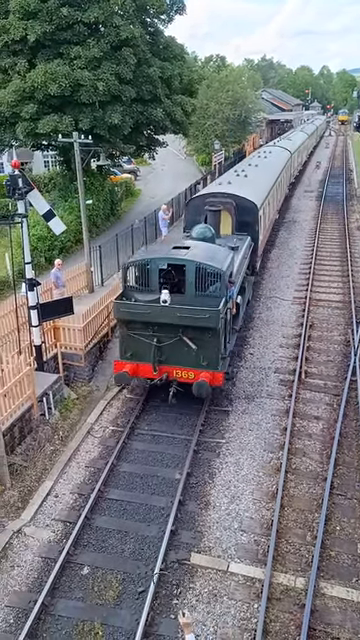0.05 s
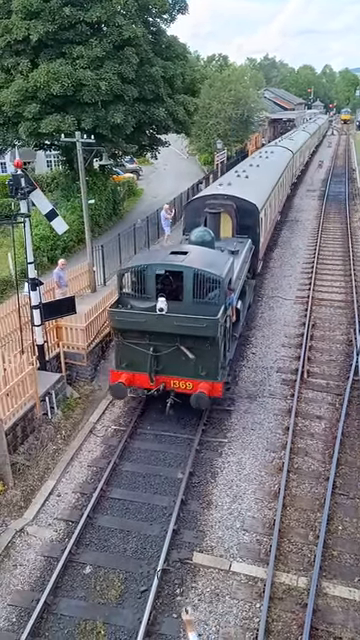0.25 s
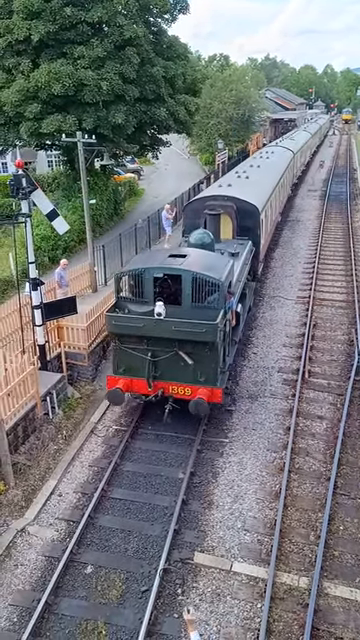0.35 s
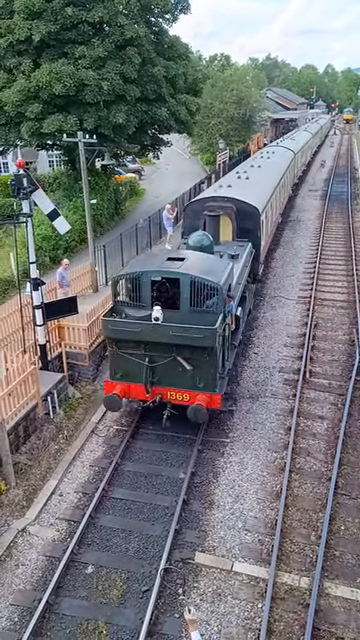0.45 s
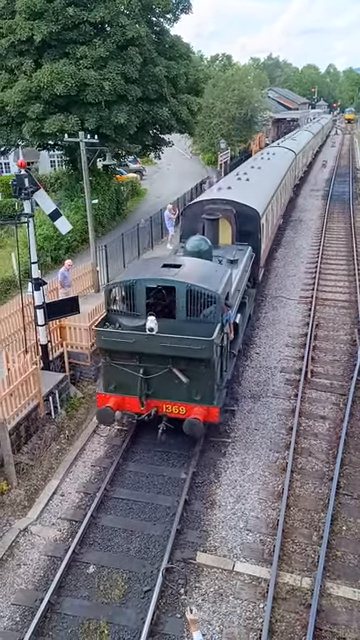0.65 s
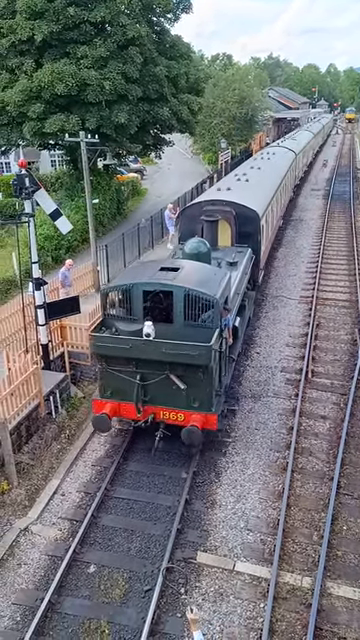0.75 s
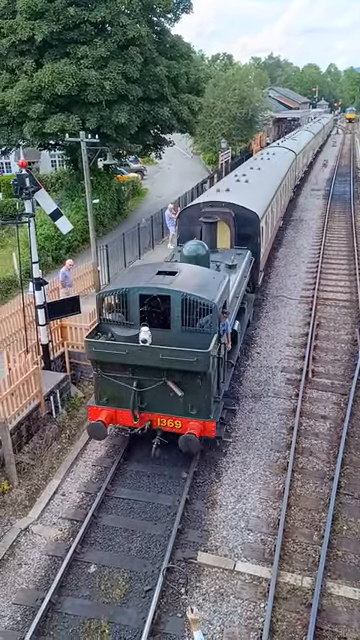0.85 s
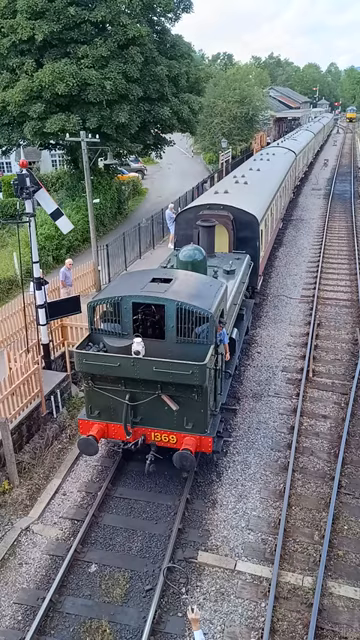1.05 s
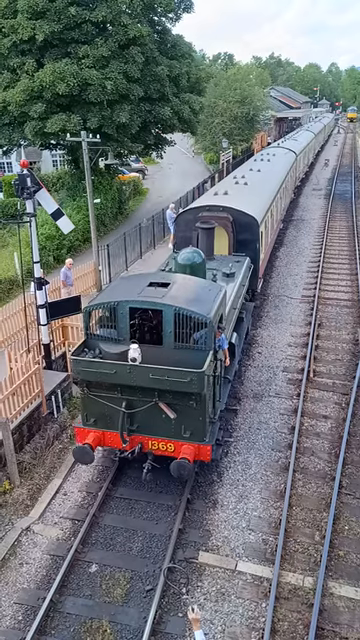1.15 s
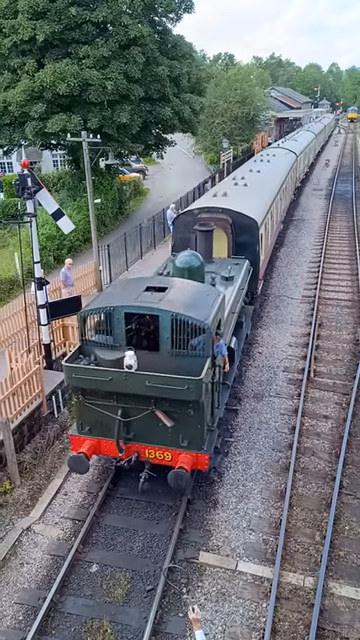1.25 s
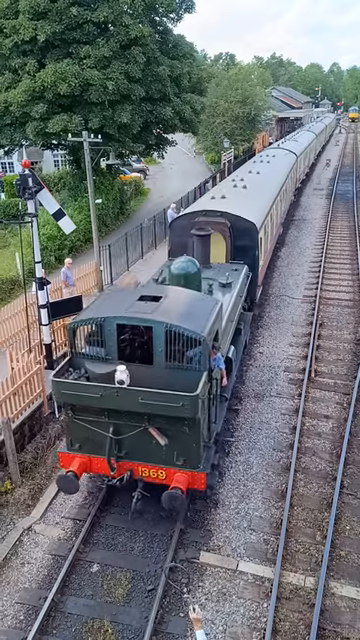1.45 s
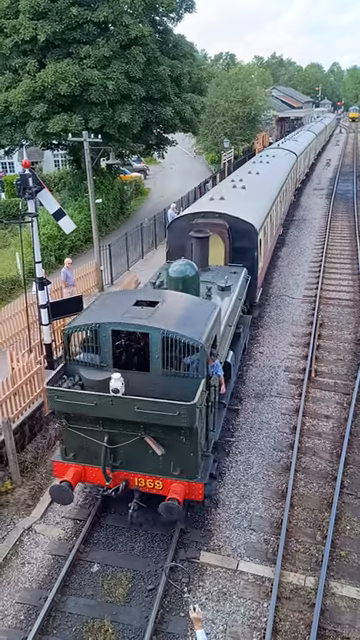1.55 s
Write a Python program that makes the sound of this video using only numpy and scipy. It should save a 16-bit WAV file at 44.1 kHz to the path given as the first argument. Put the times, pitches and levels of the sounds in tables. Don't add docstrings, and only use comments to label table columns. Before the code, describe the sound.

Steam locomotive exhaust chuffs: a puff fades at the start, then strong ones peak near 0.25, 0.6, 0.95, 1.3 and 1.64 seconds, the first roaring loudest. Each begins with a breathy hiss and brief whistle, then a hollow, ringing boom and short outdoor echo. Between them come steam spits, soft thuds, faint wheel squeal and a light rod clink near 1.16, over quiet low rumble.

```python
import sys
import numpy as np
from scipy import signal
from scipy.fft import rfft, irfft, next_fast_len
from scipy.io import wavfile
from scipy.ndimage import uniform_filter1d, map_coordinates

SR = 44100
rng = np.random.default_rng(int(sys.argv[2]) if len(sys.argv) > 2 else 0)


def master(y):
    cut = np.clip(np.atleast_2d(y).T, -1, 1)
    pcm = np.round(cut * 32767)
    wavfile.write(sys.argv[1], SR, pcm.astype(np.int16))


def decibels_to_gain(level_db):
    exponent = np.asarray(level_db, float) / 20
    return 10 ** exponent


N = 70560
T = np.arange(N) / SR
SHARED = np.array([[1], [0]])

# (frequency [Hz], level [dB])
RUMBLE_COLOUR = [(18, -14), (30, 11.5), (309, -3), (392, -9), (523, -6.5), (883, -4.5), (955, -5),
                 (2660, -20.5), (15800, -43)]
# (frequency [Hz], time to fall 60 dB [s])
YARD_ECHO = [(100, 0.38), (1000, 0.33), (5000, 0.48), (11000, 0.079)]
# (time [s], level [dB], pitch [Hz], left over right [dB], dull rush [dB])
THUDS = [
    (0.136, -45.5, 112.1, 31, -26.5),
    (0.474, -42, 150, 2, 3.5),
    (1.198, -47.5, 125.2, 28, -32),
]
# (pitch [Hz], level [dB], time to fall 60 dB [s])
ROD_RING = [(9150, -52, .6), (9235, -53, .6), (2720, -42, .07), (4100, -42, .05), (6300, -50, .06),
            (15100, -61, .1)]
# (start [s], level [dB], pitch [Hz], end [s])
WHEEL_SINGING = [(.01, -81, 4500, .15), (.5, -66, 4500, .79), (.79, -65, 2650, .85), (1.0, -69, 5750, 1.13),
                 (1.01, -68, 6500, 1.09), (1.04, -67, 5000, 1.15), (1.4, -71, 5650, 1.45)]
# (time [s], level [dB], fall [dB per s], brightness [dB per octave])
SPITS = [
    (0.464, -27.5, 482, 4.5),
    (0.863, -34, 315, 9),
    (1.161, -43, 379, 4.8),
    (1.234, -39, 262, 5),
]
# (frequency [Hz], level [dB])
SPIT_COLOUR = [(1200, -85), (1900, 3), (2300, 3.5), (3000, 5), (4300, -1.5), (6000, -5.5), (8000, -16),
               (12200, -22.5), (15800, -35)]
# (loudest time [s], level [dB], rise [dB per s], fall [dB per s])
LEAKS = [
    (0.381, -38, 173, 300),
    (0.528, -46, 142, 189),
    (0.802, -57.5, 37, 150),
    (1.079, -70.5, 47, 5),
]
# (frequency [Hz], level [dB])
LEAK_COLOUR = [(880, -6.5), (1500, -11.5), (2120, -7), (2250, -14), (2790, -3), (4220, -4), (4570, -3),
               (13100, -19.5), (15800, -27)]
# (peak time [s], roar [dB], smokebox ringing [dB], jet hiss [dB], jet lead [s])
PUFFS = [
    (-.05, -49.5, -51, -56, 0.017),
    (0.251, -20.5, -19.5, -36, 0.048),
    (0.611, -25, -21.5, -36.5, 0.046),
    (0.934, -27.5, -21, -35, 0.049),
    (1.286, -22, -24, -35, 0.026),
    (1.64, -32, -23.5, -37.5, 0.039),
]
# (pitch [Hz], width [Hz], level [dB])
SMOKEBOX = [(290, 57, -0.5), (359, 45, -1.5), (561.6, 11.3, 5), (519, 43, 3), (706, 32, 3.5), (826, 45, -2),
            (937, 33, 1), (1045, 36, -2.5), (1158, 66, -4.5), (1384, 83, -6.5)]
# (frequency [Hz], level [dB])
ROAR_COLOUR = [(24, -83), (40, -12), (145, 1.5), (221, -3), (294, -9.5), (626, -7.5), (920, -21),
               (1960, -32), (2200, -67), (2860, -50), (4840, -120)]
# (frequency [Hz], level [dB])
JET_COLOUR = [(880, -4), (1500, 1.5), (2200, 5), (2500, 6.5), (3900, -4), (4800, 0.5), (8750, -19),
              (11800, -21.5), (15800, -41)]
# (time [s], level [dB], pitch [Hz], hold [s], fall [dB per s])
BOOMS = [(.002, -44, 139, 0.0079, 399), (0.247, -28.5, 134, 0.071, 344), (0.248, -33.5, 284.2, 0.035, 359),
         (0.339, -34.5, 143.8, 0.027, 1000), (0.473, -53, 74.3, 0.057, 400), (.465, -54, 159.7, 0.051, 693),
         (0.667, -47, 75, .04, 400), (0.591, -22.5, 135, 0.013, 389), (0.598, -37.5, 290, 0.055, 503),
         (0.612, -20.5, 159.9, 0.023, 497), (0.592, -32, 382.8, 0.027, 400),
         (0.645, -26, 138.7, 0.019, 601), (.695, -49.5, 150.3, 0.12, 600), (0.797, -54, 80, 0.036, 500),
         (0.876, -31.5, 264, 0.016, 600), (0.913, -38, 95, 0.027, 500), (0.918, -28, 129.6, 0.032, 900),
         (0.974, -41.5, 139.4, .05, 984), (1.038, -58, 149, 0.0085, 700), (1.162, -60.5, 131.2, 0.051, 494),
         (1.262, -27, 135, 0.023, 304), (1.263, -28, 290, 0.047, 603), (1.28, -30, 182.2, 0.021, 366),
         (1.332, -37, 150, 0.02, 602), (1.403, -52.5, 135, 0.054, 503)]
# (middle time [s], level [dB], pitch [Hz], length [s])
WHISTLES = [(.108, -60, 800, .015), (.216, -39, 550, .035), (.213, -41, 5300, .018), (.245, -39, 1010, .03),
            (.257, -37, 834, .03), (.31, -39, 540, .02), (.469, -40, 2750, .012), (.47, -41, 4150, .018),
            (.47, -46, 5950, .025), (.475, -63, 1300, .02), (.566, -33, 700, .014), (.595, -37, 905, .035),
            (.59, -45, 2700, .015), (.635, -42, 1110, .02), (.878, -45, 436, .018), (.877, -36, 620, .018),
            (.895, -41, 5200, .02), (.906, -33, 560, .022), (.93, -38, 1056, .015), (.945, -36, 885, .04),
            (1.05, -52, 705, .04), (1.246, -37, 5950, .014), (1.33, -40, 544, .05),
            (1.597, -52, 2700, .015), (1.597, -54, 3400, .015), (1.605, -44, 650, .03),
            (1.605, -53, 400, .03), (1.605, -50, 850, .02)]
# (frequency [Hz], left over right [dB])
LEFT_LOUDER = [(140, 2), (280, -1), (580, 7), (700, -5), (850, 1.5), (1050, 5.5), (3000, 4), (12000, 13)]
# (frequency [Hz], phase [radians])
LEFT_LEADS = [(265, -.1), (430, 1.6), (540, -1.3), (720, -1), (840, -3.9), (1010, -2.8), (1150, -2),
              (1600, 0)]
# (frequency [Hz], likeness [0 to 1])
ALIKE = [(40, 0.76), (120, 0.95), (1200, 0.83), (3000, 0.45), (8000, 0.05)]


def unit(x):
    return x / np.sqrt(np.mean(x ** 2) + 1e-20)


def along(points, hz):
    f, value = np.transpose(points)
    return np.interp(np.log(hz + 1), np.log(f + 1), value)


def wobble(rate):
    knots = rng.standard_normal(int(N * rate / SR) + 4)
    return map_coordinates(knots, [T * rate])


def filtered(x, response):
    size = next_fast_len(N + SR // 2)
    spectrum = rfft(x, size) * response(np.fft.rfftfreq(size, 1 / SR))
    return irfft(spectrum, size)[..., :N]


def swell(start, db, rise, fall, hold=0):
    before = decibels_to_gain(np.clip(rise * (start - T), -99, 200))
    after = decibels_to_gain(np.clip(fall * (T - start - hold), -99, 200))
    return 2.5 * decibels_to_gain(db) / (before + 1 / 2 + after)


def resonance(f, hz, width):
    return 1 / (1 + ((f - hz) / width) ** 2)


def steam(colour, patchy_db):
    z = signal.stft(rng.standard_normal((2, N)), nperseg=512)[2]
    streaks = uniform_filter1d(rng.standard_normal(z.shape[1:]), size=2, axis=0)
    streaks = unit(uniform_filter1d(streaks, size=6, axis=1))
    uneven = z * decibels_to_gain(patchy_db * np.clip(streaks, -3, 1.5))
    noise = signal.istft(uneven, nperseg=512)[1][:, :N]
    return unit(filtered(noise, colour))


def tone(hz, wander, rate):
    pitch = hz * (1 + wander * wobble(rate))
    return np.sqrt(2) * np.sin(2 * np.pi * np.cumsum(pitch) / SR)


def train_rumble():
    loudness = decibels_to_gain(-50 + 0.35 * wobble(9.74))
    return loudness * steam(lambda f: decibels_to_gain(along(RUMBLE_COLOUR, f)), patchy_db=3)


def station_echo(x):
    hz, t, z = signal.stft(rng.standard_normal((2, SR // 2)), SR, nperseg=256)
    fading = z * decibels_to_gain(-60 * t / along(YARD_ECHO, hz)[:, None])
    tail = signal.istft(fading, SR, nperseg=256)[1]
    tail = tail / np.linalg.norm(tail[0])
    return decibels_to_gain(-16.5) * signal.fftconvolve(x, tail, axes=1)[:, :N]


def rod_thuds():
    rush = steam(lambda f: f / (60 + f) / (1 + (f / 450) ** 4), patchy_db=-1.0)
    total = 0
    for time, db, hz, side_db, rush_db in THUDS:
        push = tone(hz, 0.101, 36.0) + decibels_to_gain(rush_db) * rush
        sides = decibels_to_gain([[side_db / 2], [-side_db / 2]])
        total = total + push * swell(time, db, rise=1900, fall=760, hold=0.0029) * sides
    return total


def wheel_singing():
    total = 0
    for start, db, hz, end in WHEEL_SINGING:
        note = tone(hz, 0.012, 450) * decibels_to_gain(2.2 * wobble(60.2))
        total = total + note * swell(start, db, rise=540, fall=130, hold=end - start)
    return SHARED * total


def rod_clink():
    strike_s, hold_s = 1.158, 0.099
    since = np.maximum(T - strike_s, 0)
    ring = 0
    for hz, db, t60 in ROD_RING:
        fading = decibels_to_gain(db - 60 * since / t60 + 4 * wobble(170))
        ring = ring + fading * tone(hz, 0.00678, 300)
    return SHARED * ring * swell(strike_s, -6.0, rise=3800, fall=2000, hold=hold_s)


def gland_spits():
    total = 0
    for time, db, fall, tilt_db in SPITS:
        def colour(f):
            return decibels_to_gain(along(SPIT_COLOUR, f) + tilt_db * np.log2((f + 1) / 4000))
        total = total + steam(colour, patchy_db=1.5) * swell(time, db, 4500, fall)
    return total


def gland_leaks():
    hiss = steam(lambda f: decibels_to_gain(along(LEAK_COLOUR, f)), patchy_db=3.5)
    return hiss * sum(swell(*leak) for leak in LEAKS)


def whistling_tones():
    total = 0
    for time, db, hz, length in WHISTLES:
        note = tone(hz, 0.035, 400) * decibels_to_gain(2.5 * wobble(250))
        total = total + note * swell(time - length / 2, db, rise=1800, fall=1000, hold=length)
    return SHARED * total


def chimney_booms():
    total = 0
    for time, db, hz, hold, fall in BOOMS:
        note = tone(hz, 0.06, 70) * decibels_to_gain(2.5 * wobble(49.53))
        total = total + note * swell(time, db, 1000, fall, hold)
    return SHARED * total


def smokebox_colour(f):
    power = sum((decibels_to_gain(db) * resonance(f, hz, width)) ** 2 for hz, width, db in SMOKEBOX)
    return np.sqrt(power) / (1 + (f / 2000) ** 4)


def exhaust_puffs():
    ringing = steam(smokebox_colour, patchy_db=2.0)
    roar = steam(lambda f: decibels_to_gain(along(ROAR_COLOUR, f)), patchy_db=4.5)
    jet = steam(lambda f: decibels_to_gain(along(JET_COLOUR, f)), patchy_db=3.5)
    jet = unit(jet * decibels_to_gain(0.39 * wobble(120)))
    ring_rise, ring_fall = 710, 358
    total = 0
    for time, roar_db, ring_db, jet_db, lead in PUFFS:
        opening = swell(time - lead, jet_db - 4.0, rise=1040, fall=245, hold=lead + 0.0029)
        second_swell = swell(time, jet_db - 2.5, ring_rise, ring_fall)
        total = total + roar * swell(time, roar_db, rise=464, fall=251, hold=0.018)
        total = total + ringing * swell(time, ring_db, ring_rise, ring_fall)
        total = total + jet * (opening + second_swell)
    return total


def two_microphones(pair):
    left_lag_s = 0.000685
    side = np.array([[1], [-1]])

    def blend(f):
        angle = np.arccos(np.clip(along(ALIKE, f), 0, 1)) / 2
        return np.array([np.cos(angle), np.sin(angle)])

    def side_response(f):
        phase = along(LEFT_LEADS, f) / 2 - np.pi * left_lag_s * f
        return decibels_to_gain(side * along(LEFT_LOUDER, f) / 2) * np.exp(1j * side * phase)

    same, other = filtered(pair, blend)
    return filtered(np.array([same + other, same - other]), side_response)


def scene():
    engine = exhaust_puffs() + chimney_booms() + whistling_tones()
    engine = engine + gland_spits() + gland_leaks() + rod_clink() + wheel_singing()
    rumble = train_rumble()
    return two_microphones(engine + station_echo(engine) + rumble) + rod_thuds()


def top_cut(x):
    return signal.sosfilt(signal.butter(12, 15850, fs=SR, output="sos"), x)


def record(dry):
    top_hz, bass_hz = 15850, 55
    soft = dry / (1 + np.abs(dry / 0.9) ** 4) ** (1 / 4)
    mix = filtered(soft, lambda f: (f < top_hz) * f ** 2 / (f ** 2 + bass_hz ** 2))
    return top_cut(mix)


dry = scene()
out = record(dry)
master(out)
```